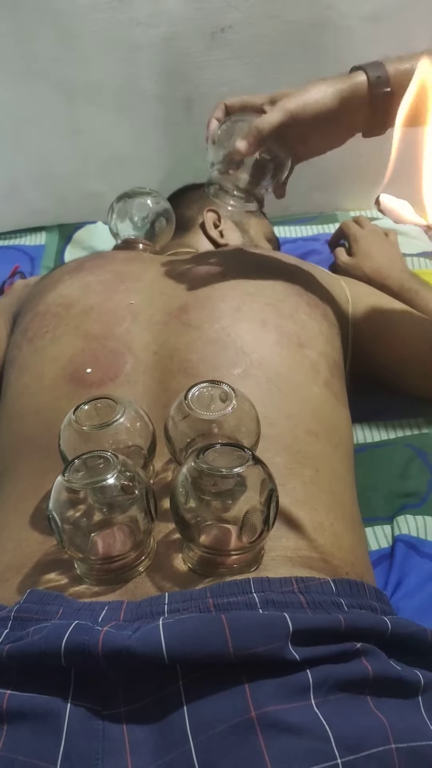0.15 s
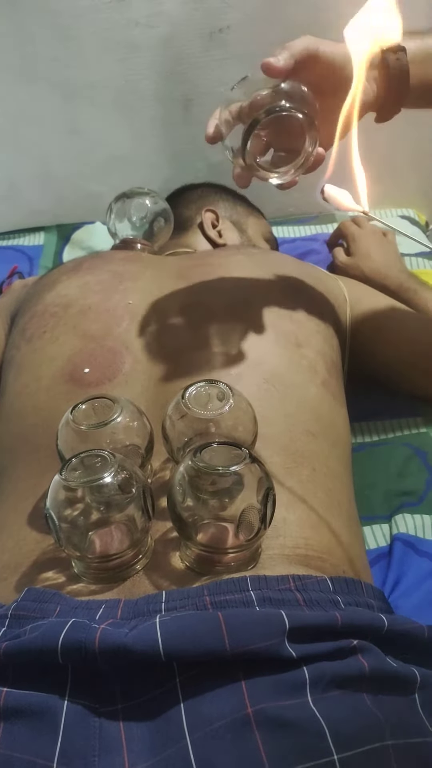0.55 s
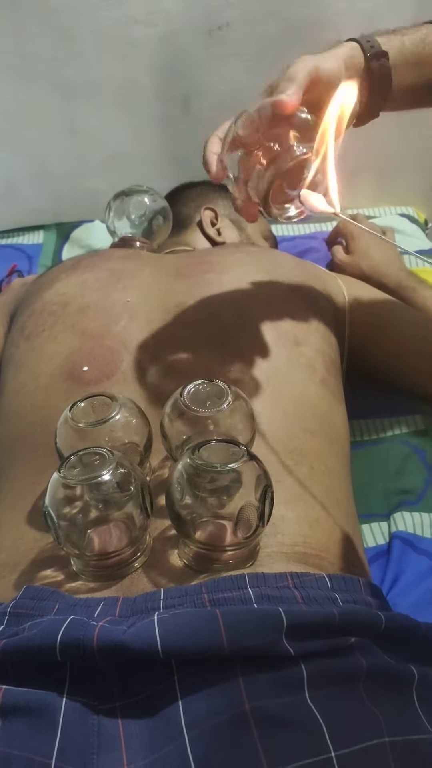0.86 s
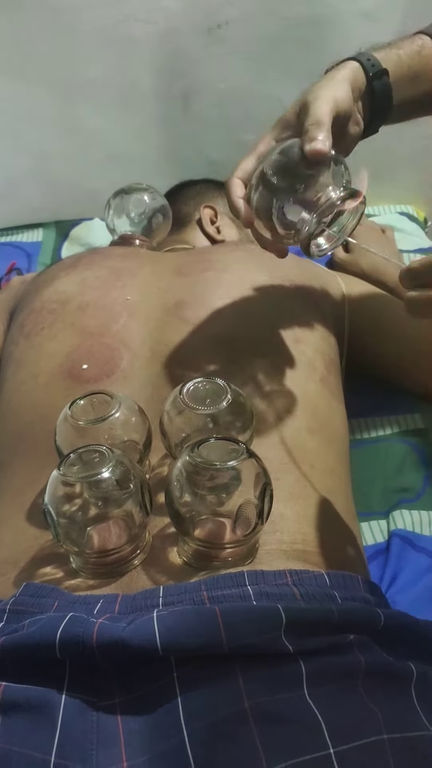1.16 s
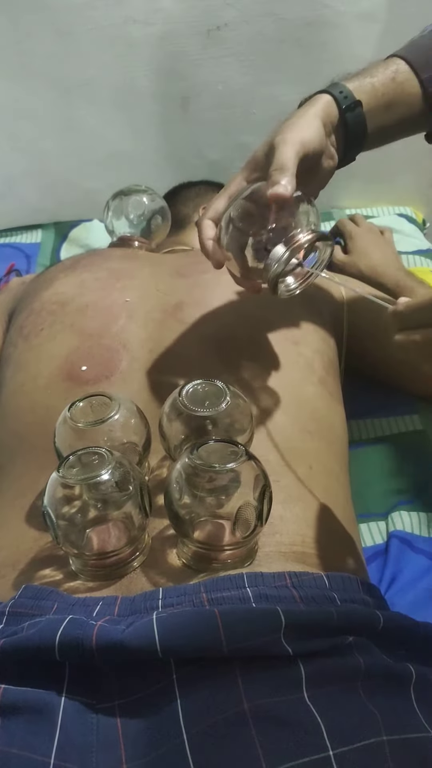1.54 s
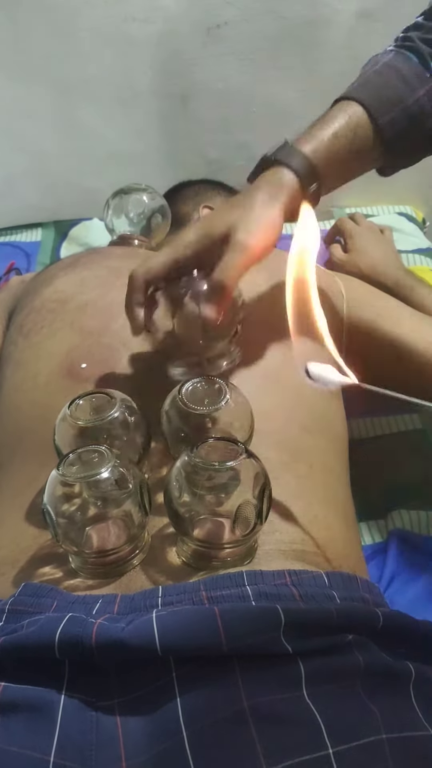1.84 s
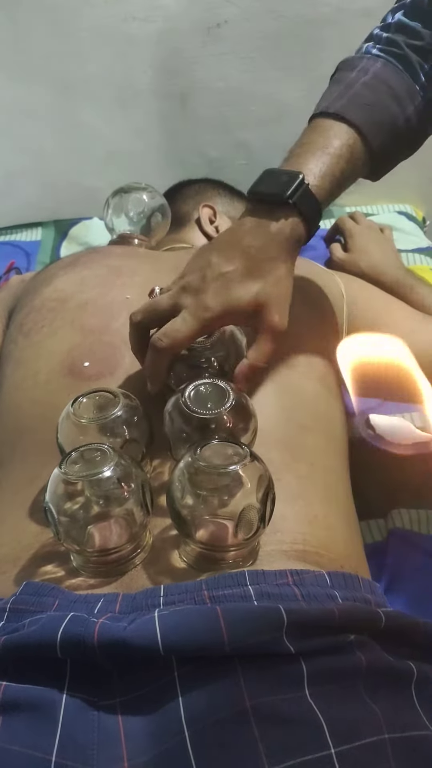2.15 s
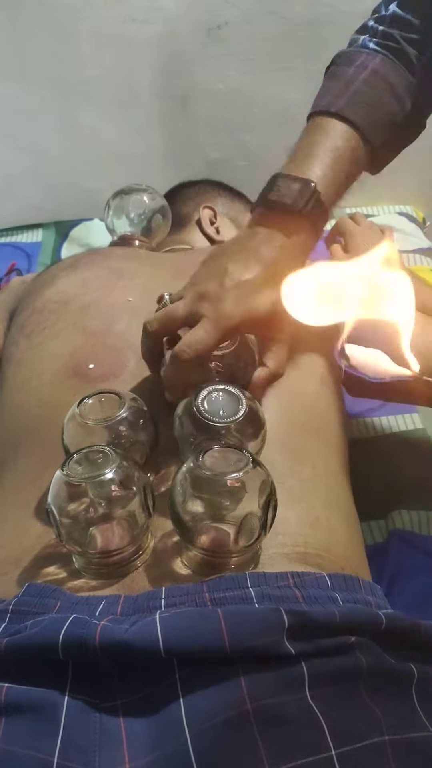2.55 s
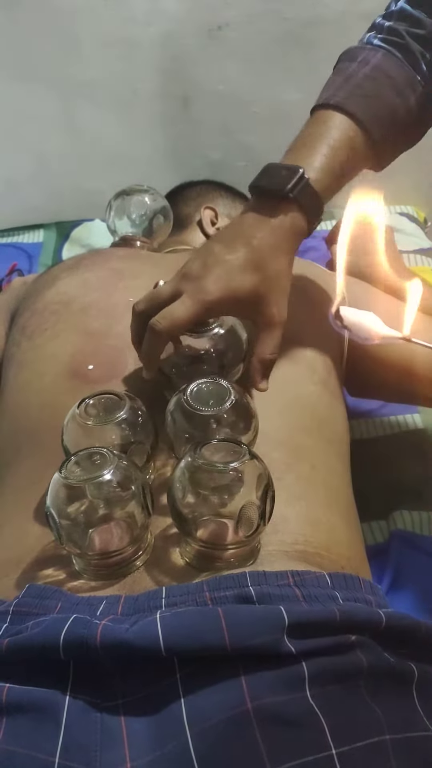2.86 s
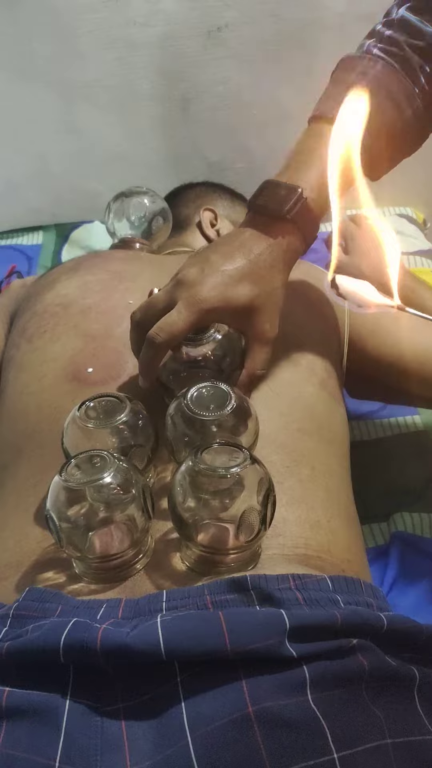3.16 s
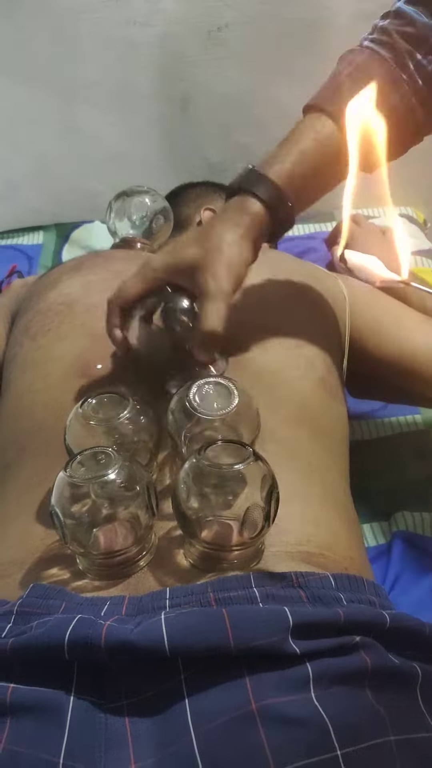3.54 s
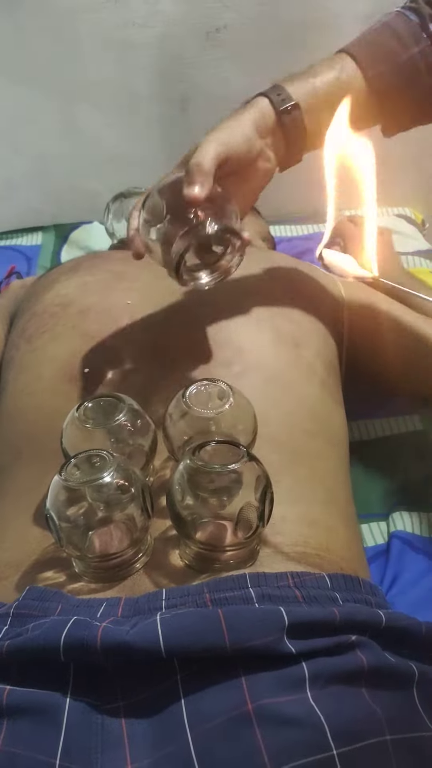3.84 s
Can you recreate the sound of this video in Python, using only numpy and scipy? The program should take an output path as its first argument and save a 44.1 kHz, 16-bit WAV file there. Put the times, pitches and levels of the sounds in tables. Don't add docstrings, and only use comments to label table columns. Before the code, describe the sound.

A glass cup is pressed and slid on a back with bursts of dry creaking knocks, then pulled off with a hissy pop and quickening rattle, close to the microphone in a small quiet room.

```python
import sys
import numpy as np
from scipy import signal
from scipy.io import wavfile

SR = 44100
rng = np.random.default_rng(int(sys.argv[2]) if len(sys.argv) > 2 else 0)


def transcribe(u):
    v = np.clip(np.atleast_2d(u).T, -1, 1)
    q = np.round(v * 32767).astype(np.int16)
    wavfile.write(sys.argv[1], SR, q)


def volts_from_decibels(level):
    exponent = np.asarray(level, float) / 20
    return 10 ** exponent


N = 176400


def rms_one(x):
    return x / np.sqrt(np.mean(x ** 2) + 1e-20)


def in_time(rows):
    s, *columns = np.transpose(rows)
    return [np.interp(np.arange(N) / SR, s, column) for column in columns]


def at_hz(points, hz):
    point_hz, values = np.array(points).T
    return np.interp(np.log(hz), np.log(point_hz), values)


def clicks(s, gain):
    out = np.full(N, 1e-18)
    np.add.at(out, (np.asarray(s) * SR).astype(int), gain)
    return out


def drift(rate):
    r = np.exp(-80 * np.pi * rate / SR)
    slow = signal.lfilter([1], [1, -2 * r, r * r], rng.standard_normal(N // 40 + 2002))[2000:]
    return np.interp(np.arange(N) / 40, np.arange(len(slow)), rms_one(slow))


def ring(x, hz, t60):
    r, w = volts_from_decibels(-60 / (t60 * SR)), 2 * np.pi * hz / SR
    return signal.lfilter([0, np.sin(w)], [1, -2 * r * np.cos(w), r * r], x)


def peak(x, hz, width_hz):
    r = np.exp(-np.pi * width_hz / SR)
    b = np.array([1, 0, -1]) * (1 - r * r) / 2
    return signal.lfilter(b, [1, -2 * r * np.cos(2 * np.pi * hz / SR), r * r], x)


def low_pass(x, order, hz):
    return signal.sosfilt(signal.butter(order, hz, fs=SR, output="sos"), x)


def lean(x, db):
    return x * volts_from_decibels([[db / 2], [-db / 2]])


def banded_noise(spectrum, patchy_db, rate):
    # frequency in Hz, left-right likeness from 0 to 1.
    likeness = [(60, 0.99), (240, 0.89), (950, 0.29), (3770, 0.0), (15000, 0.05)]
    # frequency in Hz, left-minus-right level in dB.
    port_lean = [(300, -1), (700, -.5), (2400, 3.5), (13000, 7)]
    lowest, highest = spectrum[0][0], spectrum[-1][0]
    edges = lowest * 2 ** np.arange(0, np.log2(highest / lowest) + .1, 1 / 5)
    out, white = 0, rng.standard_normal((2, 2, N))
    for k, (low, high) in enumerate(zip(edges, edges[1:])):
        band = signal.butter(2, [low, high], "band", fs=SR, output="sos")
        mid, side = signal.sosfilt(band, white[k % 2])
        hz = np.sqrt(low * high)
        alike = np.clip(at_hz(likeness, hz), -1, 1)
        pair = np.sqrt(1 + alike) * mid + np.sqrt(1 - alike) * side * [[1], [-1]]
        level = volts_from_decibels(at_hz(spectrum, hz) + patchy_db * drift(rate))
        out = out + level * lean(pair, at_hz(port_lean, hz))
    return rms_one(out)


def room(x):
    # delay in ms, gain.
    near_left = [(0.0, 0.99), (1.68, -0.21), (2.43, 0.17), (4.34, 0.33), (5.29, -0.17), (6.13, 0.37),
                 (6.56, 0.17), (7.58, 0.19), (8.51, -0.19), (12.77, 0.24), (13.97, 0.14), (15.7, 0.11)]
    near_right = [(0.03, 0.35), (0.82, 0.12), (1.25, 0.08), (2.5, -0.11), (3.61, -0.09), (4.04, 0.24),
                  (5.02, -0.13), (6.92, 0.11), (9.05, 0.12), (11.37, -0.17), (12.14, -0.1), (13.61, 0.06)]
    t60_s, onset_s = 0.3, 0.01
    t, sides = np.arange(SR // 2) / SR, []
    for near, tail_db in [(near_left, -8.5), (near_right, -10)]:
        tail = rng.standard_normal(len(t)) * volts_from_decibels(-60 * t / t60_s) * np.clip(t / onset_s, 0, 1) ** 2
        tail = tail - .45 * peak(tail, 1450, 1450 / 2)
        response = volts_from_decibels(tail_db) * tail / np.sqrt(np.sum(tail ** 2))
        for delay_ms, gain in near:
            response[int(abs(delay_ms) * SR / 1000)] += gain
        sides.append(signal.fftconvolve(x, response)[:N])
    return np.array(sides)


def room_air():
    # frequency in Hz, density in dB per Hz.
    air_colour = [(35, -12), (50, -5), (70, -9), (120, -5), (190, -8), (315, -1), (800, -6), (1700, -9),
                  (3000, -13), (3800, -40)]
    hiss_colour = [(3000, -12), (3600, 4), (5800, -0.5), (7000, -4.5), (9000, -4), (11500, -7.5),
                   (14000, -2.5), (16000, -28.5)]
    murmur = volts_from_decibels(-61.5 + 0.5) * banded_noise(air_colour, patchy_db=3.0, rate=5)
    return murmur + volts_from_decibels(-74.5) * banded_noise(hiss_colour, patchy_db=0.8, rate=3)


def fan_whine():
    # time in seconds, level in dB.
    whistle = [
        (0, -88),
        (.45, -64.5),
        (1.0, -69.5),
        (1.3, -78),
        (4, -103),
    ]
    whistle_db, = in_time(whistle)
    white = rng.standard_normal((2, N))
    return volts_from_decibels(whistle_db + 3.1 * drift(5.4)) * rms_one(peak(peak(white, 1770, 120), 1930, 300))


def flame():
    # time in seconds, level in dB.
    flutter = [
        (0, -70.5),
        (.7, -62),
        (.92, -60),
        (1.15, -75.5),
        (1.95, -63),
        (2.15, -51.5),
        (2.35, -69),
        (3.5, -68.5),
        (3.65, -47.5),
        (3.85, -67),
    ]
    flutter_db, = in_time(flutter)
    return volts_from_decibels(flutter_db) * banded_noise([(130, -2.5), (320, 6.5), (800, -3.5)], patchy_db=7.5, rate=17.0)


def fan():
    fan_hz, width_hz, turn_s, gap_s, tone_share = 94, 30, .2512, .014, .55
    t = np.arange(N) / SR
    rough = rms_one(peak(peak(rng.standard_normal(N), fan_hz, width_hz), fan_hz, width_hz * 2))
    tone = np.sqrt(2) * np.sin(2 * np.pi * np.cumsum(fan_hz + 3 * drift(2.133)) / SR)
    throb = np.abs(np.sin(np.pi * (t - gap_s) / turn_s)) ** .7
    blades = tone_share * tone + (1 - tone_share) * rough
    return lean(volts_from_decibels(-52.5 + 3.5 + 0.5 * drift(2.5)) * throb * blades, 1.0)


def cricket():
    # centre of the pulse in seconds, level in dB.
    chirps = [(.0, -60.5), (0.159, -58), (0.368, -58.5), (0.582, -56), (0.784, -55.5), (1.0, -67.5),
              (1.23, -65), (1.46, -55.5), (1.68, -65), (1.901, -59), (2.129, -57.5), (2.37, -68.5),
              (2.74, -62), (3.01, -63), (3.188, -52.5), (3.27, -70), (3.44, -67.5), (3.82, -55.5),
              (3.87, -67.5)]
    chirp_hz, width_hz, rise_s, fall_s = 3166, 65, 0.021, 0.064
    t = np.arange(N) / SR
    pulses = 0
    for s, db in chirps:
        pulses = pulses + volts_from_decibels(db) * np.exp(-.5 * ((t - s) / np.where(t < s, rise_s, fall_s)) ** 2)
    white = rng.standard_normal((2, 2, N))
    main = rms_one(peak(peak(white[0], chirp_hz, width_hz), chirp_hz, 300))
    side_band = volts_from_decibels(-19.5) * rms_one(peak(peak(white[1], 3390, 350), 3390, 350))
    octave = volts_from_decibels(-19.5) * rms_one(peak(peak(white[1], 6270, 330), 6570, 400))
    return lean(0.81 * pulses * (main + side_band + octave), 3.4)


def slip_grit(slips):
    s, db = np.transpose(slips)
    hold = np.exp(-1 / (0.0097 * SR))
    load = np.minimum(signal.lfilter([1], [1, -hold], clicks(s, volts_from_decibels(db))), .14)
    tiny = rng.random(N) < 900 / SR
    return load, load * volts_from_decibels(-9) * tiny * rng.standard_normal(N)


def contact_knocks(slips, bounces, grit):
    unit = np.eye(1, 600)[0]
    wood = peak(peak(unit, 1460, 840), 1460, 840)
    frame = peak(peak(unit, 933, 876), 933, 876)
    wood, frame = wood / wood.max(), frame / frame.max()
    loaded = signal.lfilter(*signal.butter(4, 2400, fs=SR), wood + volts_from_decibels(-11) * frame)
    free = signal.lfilter(*signal.butter(4, 3330, fs=SR), wood + volts_from_decibels(-19) * frame)
    s, db = np.transpose(slips)
    hard = 1 / (1 + volts_from_decibels(2 * (-16 - db)))
    dull = low_pass(clicks(s, volts_from_decibels(db) * (1 - hard)) + grit, 2, 2040)
    creak = np.roll(clicks(s, volts_from_decibels(db) * hard) + dull, int(.00033 * SR))
    s, db = np.transpose(bounces)
    chatter = clicks(s + .00045, volts_from_decibels(db))
    return (np.convolve(creak, loaded / loaded.max()) + np.convolve(chatter, free / free.max()))[:N]


def contact_squeaks(contacts, load, grit):
    # frequency in Hz, level in dB, decay t60 in seconds.
    squeak_modes = [(4410, -26.5, 0.0033), (6360, -27, 0.0033), (6890, -22, 0.0098), (12600, -23.5, 0.0011),
                    (14150, -16, 0.0052)]
    s, db = np.transpose(contacts)
    strikes = clicks(s + .00045, volts_from_decibels(1.58 * db + rng.normal(0, 1, len(s))))
    rub = signal.lfilter([.1], [1, -.99], strikes + 2.0 * load * np.abs(grit)) * rng.standard_normal(N)
    return sum(volts_from_decibels(mode_db) * ring(rub, hz, t60) for hz, mode_db, t60 in squeak_modes)


def joint_and_bounces():
    # start in seconds, level in dB.
    creak_slips = [(1.9305, -24), (1.9348, -4), (1.9543, -10), (1.961, -13), (1.9672, -17), (1.9746, -18),
                   (1.979, -15), (1.9853, -8), (1.9937, -14), (2.0047, -18), (2.02, -20), (2.044, -21),
                   (2.2573, -28), (2.2637, -30), (2.2812, -21), (2.2894, -24), (2.4789, -26), (2.491, -16),
                   (2.4954, -20), (2.503, -19), (2.5064, -11), (2.5112, -15), (2.5168, -4), (2.5245, -7),
                   (2.534, -7), (2.5429, -13), (2.5491, -17), (2.5546, -16), (2.5621, -20), (2.6088, -22),
                   (2.6108, -19), (2.6149, -23), (2.6188, -24), (2.6232, -19), (2.6385, -28), (2.6424, -20),
                   (2.648, -19), (2.652, -22), (2.6633, -27),
                   (2.754, -26), (2.7618, -13), (2.7686, -16), (2.7833, -10), (2.7914, -20), (2.8, -14),
                   (2.8129, -14), (2.8233, -9), (2.8328, -19), (2.8415, -20), (2.849, -21), (2.8607, -25),
                   (2.8755, -28), (3.0325, -15), (3.0441, -20), (3.0602, -18), (3.0729, -23), (3.0839, -24),
                   (3.0951, -28), (3.2253, -26), (3.2405, -23), (3.2543, -18), (3.259, -24), (3.2683, -25),
                   (3.2762, -28)]
    bounces = [
        (3.5938, 0),
        (3.6352, 0),
        (3.6691, -3),
        (3.6928, -6),
        (3.712, -10),
        (3.7269, -15),
        (3.739, -19),
        (3.7483, -20),
        (3.7552, -23),
        (3.7644, -28),
    ]
    slips = creak_slips
    load, grit = slip_grit(slips)
    knocks = contact_knocks(slips, bounces, grit)
    squeaks = contact_squeaks(slips + bounces, load, grit)
    return volts_from_decibels(-5) * (room(knocks) + lean(room(squeaks), 1.7))


def skin_thumps():
    # start in seconds, level in dB, frequency in Hz, decay t60 in seconds.
    thump_rows = [
        (2.072, -35.5, 92, 0.14),
        (2.201, -41, 166, 0.095),
        (3.545, -21.5, 214, 0.024),
        (3.547, -38, 99, 0.33),
    ]
    return sum(peak(ring(clicks([s], volts_from_decibels(db)), hz, t60), hz, hz) for s, db, hz, t60 in thump_rows)


def skin_ticks():
    # start in seconds, peak level in dB.
    tick_rows = [
        (0.1838, -54),
        (1.7527, -53),
        (2.583, -35.5),
        (3.4183, -50.5),
        (3.8183, -38.5),
    ]
    s, db = np.transpose(tick_rows)
    burst = rng.standard_normal(300) * volts_from_decibels(-60 * np.arange(300) / SR / 0.0087)
    ticks = signal.fftconvolve(clicks(s, volts_from_decibels(db)), burst)[:N]
    return lean(1.4 * peak(ticks, 14000, 5000) + .15 * peak(ticks, 6000, 4000), 4.9)


def glass_ring():
    # frequency in Hz, level in dB, decay t60 in seconds.
    glass_modes = [
        (4050, -63, 1.5),
    ]
    return sum(ring(clicks([3.54], volts_from_decibels(db)), hz, t60) for hz, db, t60 in glass_modes) * volts_from_decibels(2 * drift(20))


def leak_hiss():
    # time in seconds, level in dB.
    leak_curve = [
        (3.5, -71),
        (3.52, -40.5),
        (3.538, -16),
        (3.548, -18.5),
        (3.565, -23),
        (3.6, -39.5),
        (3.85, -74),
    ]
    # frequency in Hz, density in dB per Hz.
    leak_colour = [(600, -12), (900, -6.5), (2700, -18), (3600, -25), (4200, -16), (7100, -11),
                   (10200, -12), (13100, -2.5), (16000, 6.5)]
    # frequency in Hz, width in Hz, level in dB.
    gap_bands = [(1780, 290, -2.5), (2520, 540, -1), (4050, 170, -5), (4790, 120, -5.5), (5580, 120, -12),
                 (7060, 160, 0)]
    leak_db, = in_time(leak_curve)
    white = rng.standard_normal((2, N))
    gap = sum(volts_from_decibels(db) * rms_one(peak(peak(white, hz, width_hz), hz, width_hz)) for hz, width_hz, db in gap_bands)
    rush = banded_noise(leak_colour, patchy_db=1.5, rate=20)
    return volts_from_decibels(leak_db) * lean(rush + volts_from_decibels(-19) * gap, 2)


def air_pop():
    # time in seconds, pitch in Hz, level in dB.
    pop_curve = [
        (3.5445, 400, -60),
        (3.549, 425, -33),
        (3.553, 455, -22),
        (3.557, 530, -18.5),
        (3.562, 600, -17.5),
        (3.569, 615, -15),
        (3.575, 620, -19),
        (3.58, 570, -31),
        (3.585, 630, -27),
        (3.605, 640, -42),
    ]
    hz, db = in_time(pop_curve)
    t = np.arange(N) / SR
    first_s, last_s = pop_curve[0][0], pop_curve[-1][0]
    gate = (t > first_s) * np.clip(1 - (t - last_s) / 0.032, 0, 1)
    pop = volts_from_decibels(db) * gate * np.sin(2 * np.pi * np.cumsum(hz) / SR)
    tail = rng.standard_normal(SR // 3) * volts_from_decibels(-60 * t[:SR // 3] / .28 - 46)
    return lean(pop + signal.fftconvolve(pop, tail)[:N], -5)


def cup():
    return skin_thumps() + skin_ticks() + glass_ring() + leak_hiss() + air_pop()


def shade(x):
    treble = signal.sosfiltfilt(signal.butter(4, 10000, "high", fs=SR, output="sos"), x[1])
    return np.array([x[0], x[1] - .75 * treble])


def scene():
    left, right = room_air() + flame() + fan()
    background = np.array([np.roll(left, 8), right])
    return background + fan_whine() + cricket() + shade(joint_and_bounces() + cup())


def band_limit(x):
    return signal.sosfilt(signal.butter(12, 16470, fs=SR, output="sos"), x)


def record(dry):
    mix = signal.sosfilt(signal.cheby2(10, 40, 16200, fs=SR, output="sos"), dry)
    return band_limit(mix)


dry = scene()
out = record(dry)
transcribe(out)
```